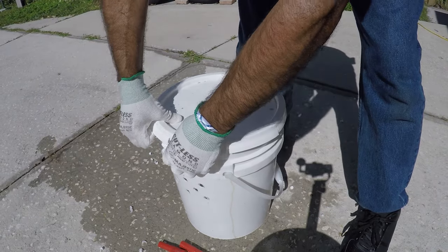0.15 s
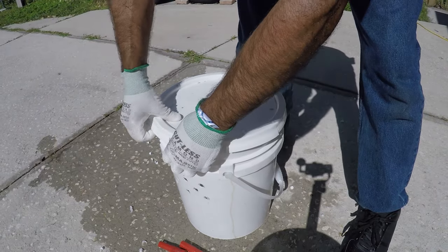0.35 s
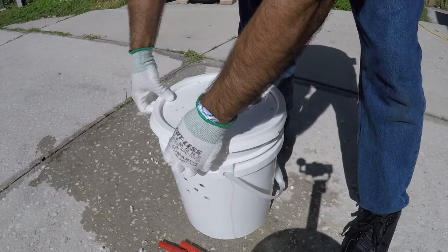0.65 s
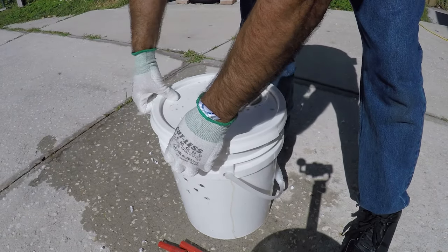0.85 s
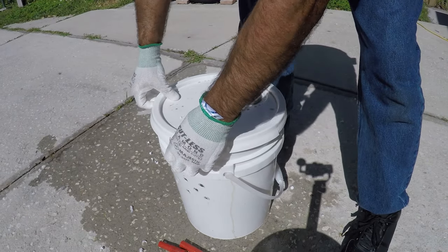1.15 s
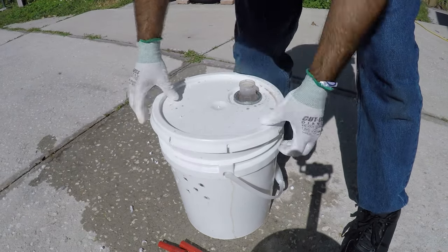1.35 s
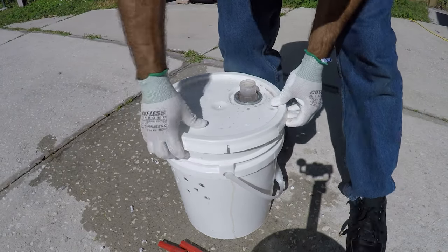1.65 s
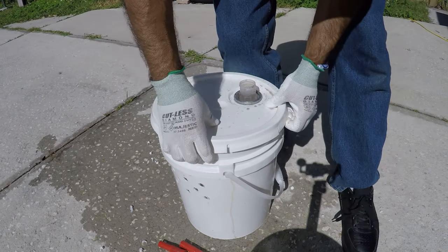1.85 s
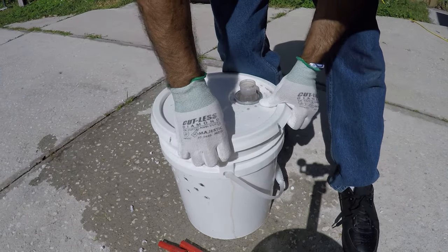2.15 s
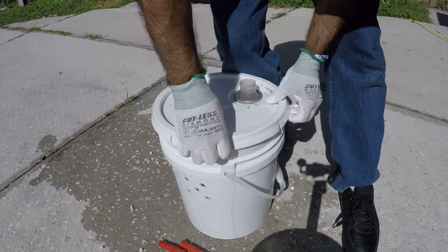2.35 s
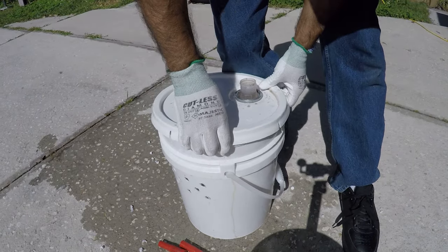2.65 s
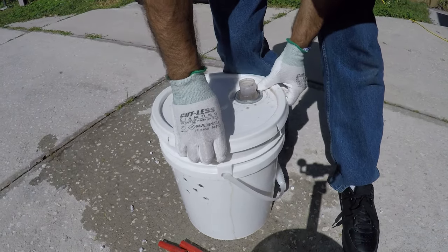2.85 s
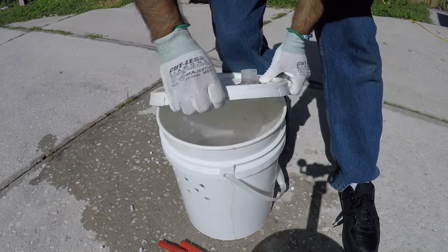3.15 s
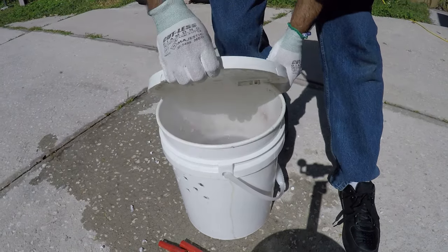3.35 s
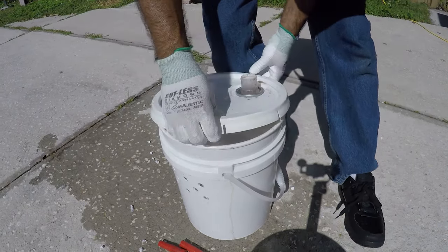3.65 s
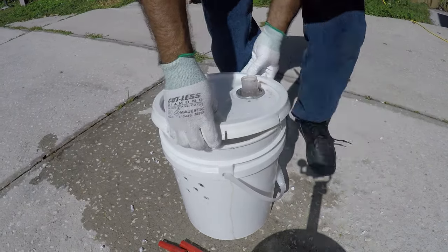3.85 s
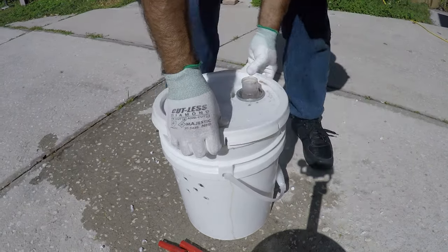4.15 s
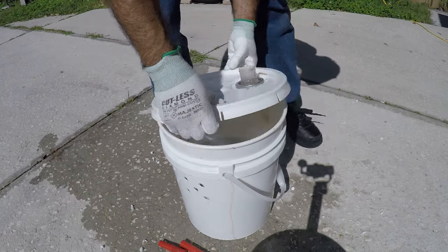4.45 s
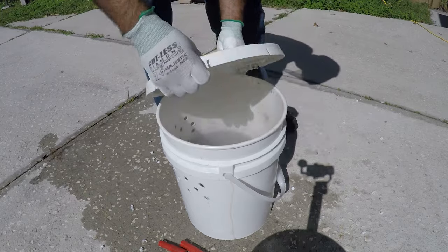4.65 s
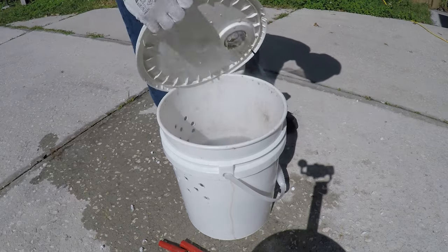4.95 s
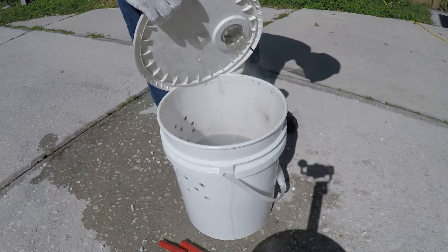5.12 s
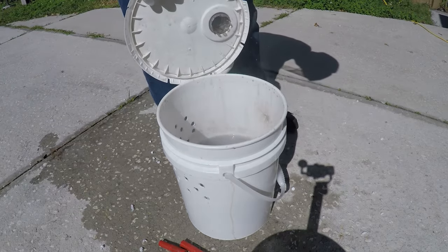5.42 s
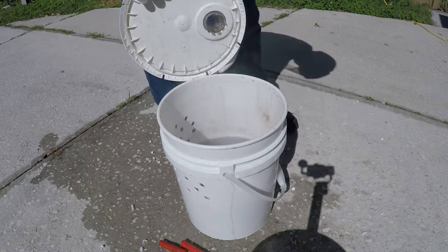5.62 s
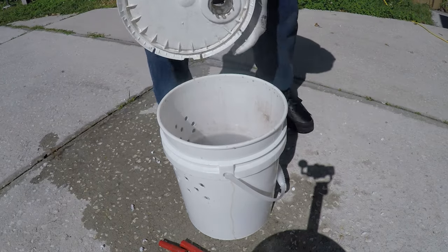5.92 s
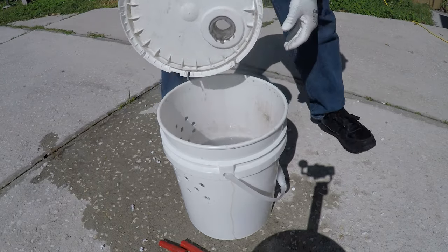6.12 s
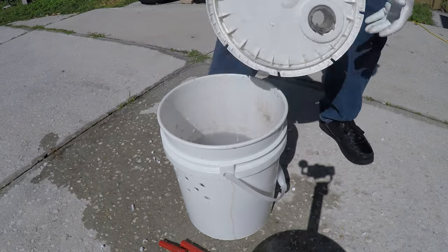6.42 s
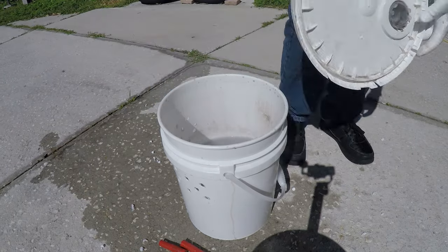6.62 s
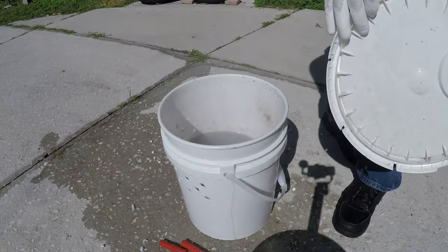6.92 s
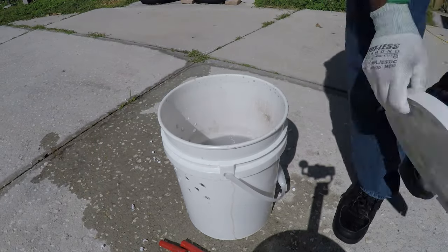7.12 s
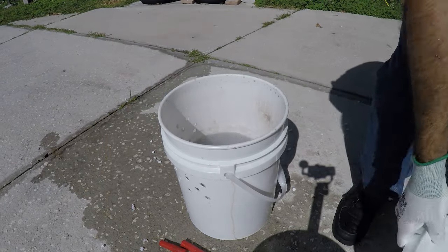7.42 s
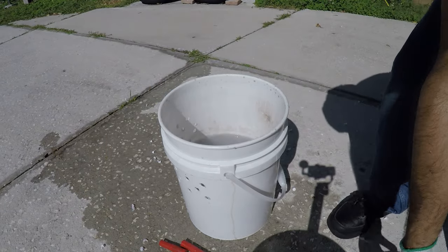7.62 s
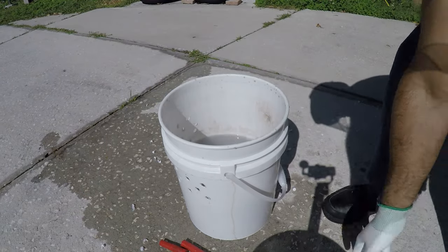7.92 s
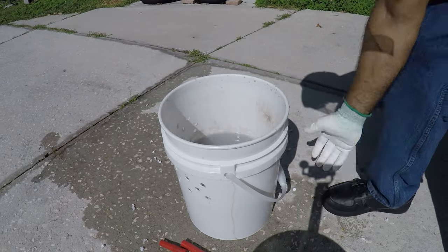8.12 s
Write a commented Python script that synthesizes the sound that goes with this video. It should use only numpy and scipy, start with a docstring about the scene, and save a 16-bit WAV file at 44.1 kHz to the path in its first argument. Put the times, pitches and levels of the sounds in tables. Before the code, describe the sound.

Plastic lid tabs pop loose one by one over a drumming empty bucket, a big knock follows, then the lid clatters down on concrete.

```python
"""Outdoors on concrete, gloved hands prise the lid off an empty plastic bucket, tab by tab, and drop it on the ground.
Each tab snaps as decaying noise and sets lid and air ringing as sines; short noise bursts tick and ring around it.
Gloves and shoes rub as jerky noise, strained plastic creaks in wavering tones, the loose lid rattles its modes.
Far traffic rumbles in noise bands with an engine drone; gain control ducks everything after loud blows.
Table levels are set before panning and gain control."""
import sys
import numpy as np
from scipy import signal
from scipy.io import wavfile
from scipy.ndimage import uniform_filter1d

SR = 44100
rng = np.random.default_rng(int(sys.argv[2]) if len(sys.argv) > 2 else 0)


def bounce(signal):
    """Save signal as a 16-bit WAV file at the path given by the first command-line argument."""
    frames = np.transpose(np.atleast_2d(signal))
    limited = np.clip(frames, -1, 1)
    pcm = np.round(limited * 32767).astype(np.int16)
    wavfile.write(sys.argv[1], SR, pcm)


N = 365148   # samples
SECONDS = np.arange(N) / SR
BLOW_SECONDS = np.arange(SR // 3) / SR   # time within one blow


def from_db(db):
    """Decibels to an amplitude factor."""
    return 10 ** (np.asarray(db) / 20)


def rms_one(x):
    """Scale a signal to rms 1."""
    return x / np.sqrt(np.mean(x ** 2) + 1e-20)


def in_time(rows):
    """Draw each column as a curve over the whole scene."""
    times, *columns = np.transpose(rows)
    return [np.interp(SECONDS, times, column) for column in columns]


def sounding(rows):
    """1 while a curve lasts, 0 outside, with soft ends."""
    to_nearest_end = np.minimum(SECONDS - rows[0][0], rows[-1][0] - SECONDS)
    return np.clip(to_nearest_end / 0.061 + .5, 0, 1)


def at_hz(points, hz):
    """Read a frequency curve, interpolated over log frequency."""
    curve_hz, values = np.array(points).T
    return np.interp(np.log(hz), np.log(curve_hz), values)


def band(x, low_hz, high_hz):
    """Keep the part of a sound between two frequencies."""
    return signal.sosfilt(signal.butter(2, [low_hz, high_hz], "band", fs=SR, output="sos"), x)


def drift(rate_hz):
    """Slow random curve of rms 1: noise smoothed by two equal poles, computed every 40 samples."""
    pole = np.exp(-80 * np.pi * rate_hz / SR)
    noise = rng.standard_normal(N // 40 + 2002)
    slow = signal.lfilter([1], [1, -2 * pole, pole * pole], noise)[2000:]   # drop the filter's start
    return np.interp(np.arange(N) / 40, np.arange(len(slow)), rms_one(slow))


def ring(clicks, hz, t60_s):
    """A two-pole resonator: a unit click starts a dying sine of about height 1."""
    pole = from_db(-60 / (t60_s * SR))
    turn = 2 * np.pi * hz / SR
    return signal.lfilter([0, np.sin(turn)], [1, -2 * pole * np.cos(turn), pole * pole], clicks + 1e-18)


def add(out, x, s):
    """Mix a short sound in at a time in seconds."""
    at = round(s * SR)
    out[at:at + len(x)] += x[:N - at]


def dying(db, t60_s, rise_s):
    """Envelope of one blow: a quick rise and an exponential fall, a third of a second long."""
    fall = from_db(db - 60 * BLOW_SECONDS / max(t60_s, .005))
    return fall * (1 - np.exp(-BLOW_SECONDS / rise_s))


def blow_tone(hz):
    """Steady sine to be shaped by a blow's envelope."""
    return np.sin(2 * np.pi * hz * BLOW_SECONDS)


def grit(spread_db, per_s):
    """Dense clicks of uneven size, rms 1."""
    sizes = from_db(spread_db * np.minimum(rng.exponential(1, N), 4)) * rng.standard_normal(N)
    return rms_one(sizes * (rng.random(N) < per_s / SR))


# Resonances of bucket rim and wall: f/Hz, width/Hz, relative level/dB
RIM_RESONANCES = [(860, 100, -12), (1196, 110, 5.5), (1655, 99, -3), (2010, 49, 0.5), (2347, 177, 1),
                  (2800, 63, 4.5), (474, 95, 3.5)]


def plastic(x, lift_db):
    """The rim and wall resonances lift parts of whatever excites them."""
    rings = 0
    for k, (hz, width_hz, db) in enumerate(RIM_RESONANCES):
        sign = (-1) ** k
        rings = rings + sign * from_db(db) * band(x, hz - width_hz / 2, hz + width_hz / 2)
    return x + from_db(lift_db) * rings


def wavering(rows, width_hz, steady):
    """A tone on its curve: a steady part plus random amplitudes that spread it over a narrow band."""
    hz, db = in_time(rows)
    phase = 2 * np.pi * np.cumsum(hz) / SR
    tone = (steady + drift(width_hz)) * np.sin(phase) + drift(width_hz) * np.cos(phase)
    return from_db(db) * sounding(rows) * tone


# Tonal balance of the far traffic: f/Hz, relative level/dB (density)
STREET_SPECTRUM = [(8.8, -34), (15, -4.5), (37, 1), (92, -4), (126, -7), (150, -15.5), (184, -12.5),
                   (350, -25), (469, -23.5), (575, -28.5), (816, -26.5), (2200, -39.5), (4980, -46.5),
                   (14700, -55), (16000, -73)]
# How alike left and right are in the traffic: f/Hz, correlation (1 = identical)
STREET_LIKENESS = [(60, 0.99), (180, 0.98), (550, 0.77), (1650, 1), (4970, 0.63), (15000, 0.059)]


def street():
    """Far traffic: half-octave bands of stereo noise, each swelling a little on its own."""
    out = 0
    edges_hz = 16 * 2 ** np.arange(0, 10.3, .5)
    white = rng.standard_normal((2, 2, N + SR // 2))   # neighbouring bands take turns with two sources
    for k, (low_hz, high_hz) in enumerate(zip(edges_hz, edges_hz[1:])):
        mid, side = band(white[k % 2], low_hz, high_hz)[:, -N:]
        hz = np.sqrt(low_hz * high_hz)
        alike = np.clip(at_hz(STREET_LIKENESS, hz), -1, 1)
        gain = from_db(at_hz(STREET_SPECTRUM, hz) + 0.32 * drift(3.0))
        out = out + gain * (np.sqrt(1 + alike) * mid + np.sqrt(1 - alike) * side * [[1], [-1]])
    return from_db(-31) * rms_one(out)


# Far engine: t/s, f/Hz, level/dB
ENGINE_DRONE = [(0.0, 92.5, -37.5), (.7, 93, -35), (1.3, 95.7, -40)]


def engine():
    """A far engine holds a low, mostly steady tone."""
    return wavering(ENGINE_DRONE, 4.0, steady=2.13)


# Strokes of gloves and shoes, and a scrape of the landing lid: start t/s, length/s, drive level/dB
RUB_STROKES = [(0.385, 0.11, -47.5), (0.486, 0.2, -57.5), (0.777, 0.031, -41.5), (1.261, 0.052, -44.5),
               (1.614, 0.14, -49), (1.703, 0.1, -39.5), (1.788, 0.064, -40.5), (1.907, 0.099, -47.5),
               (2.424, 0.041, -43), (2.549, 0.04, -46.5), (2.741, 0.17, -45.5), (2.876, 0.056, -43),
               (2.962, 0.067, -41.5), (3.093, 0.023, -32.5), (3.464, 0.078, -48), (3.658, 0.02, -36.5),
               (3.746, 0.06, -43), (4.009, 0.099, -37), (4.387, 0.13, -47.5), (4.53, 0.13, -35.5),
               (5.87, 0.06, -52), (6.367, 0.07, -43), (6.52, 0.2, -53), (6.817, .04, -50),
               (6.942, 0.18, -48.5), (7.484, 0.12, -54), (7.553, 0.11, -41), (7.709, 0.059, -39.5),
               (7.839, 0.077, -26)]
ATTACK_S, RELEASE_S = 0.035, 0.092   # soft ends of a stroke
FIDGET_DB = -83   # drive level of faint handling between strokes
SLIPS_PER_S, SLIP_T60_S = 110, 0.044
SLIDE_SHARE = 0.96   # steady slide against jerks of rms 1


def rubbing():
    """Stick and slip: clumped grains in jerks, part through the plastic, part hollow, part straight hiss."""
    level = from_db(FIDGET_DB)
    for s, length_s, db in RUB_STROKES:
        fade_in = (SECONDS - s) / ATTACK_S
        fade_out = (s + length_s - SECONDS) / RELEASE_S
        level = level + from_db(db) * np.clip(np.minimum(fade_in, fade_out) + .5, 0, 1) ** 2

    slips = rng.random(N) * (rng.random(N) < SLIPS_PER_S / SR)
    slip_decay = from_db(-60 / (SLIP_T60_S * SR))
    jerks = SLIDE_SHARE + rms_one(signal.lfilter([1], [1, -slip_decay], slips))

    grains = grit(2.8, 5000) * from_db(2.2 * drift(70))
    mids = plastic(rms_one(band(grains, 150, 4150)), lift_db=-14.0)
    hollow = from_db(-1.0) * rms_one(band(grains, 240, 1040))
    hiss = from_db(-16.5) * rms_one(band(grains, 3000, 13000))
    return level * rms_one(jerks) * (mids + hollow + hiss)


# Glove squeaks: t/s, f/Hz, level/dB
GLOVE_SQUEAK = [(0.62, 6800, -65), (0.704, 7470, -47.5), (0.73, 7500, -69)]


def squeak():
    """Gloves squeak on plastic: no steady part, so the pitch is blurred and airy."""
    return wavering(GLOVE_SQUEAK, 400, steady=0)


# A tab strains in fits: t/s, f/Hz, level/dB
TAB_CREAK = [(0.36, 545, -60), (0.385, 545, -35), (0.405, 547, -56), (0.46, 597, -47), (0.53, 569, -42.5),
             (0.555, 591, -49), (0.62, 550, -45.5), (0.69, 570, -50), (0.72, 560, -65)]
# Its upper tone: t/s, f/Hz, level/dB
UPPER_CREAK = [(0.4, 940, -58), (0.45, 941, -42.5), (0.5, 930, -58)]
# A high, airy whistle over the tab's creak: t/s, f/Hz, level/dB
CREAK_WHISTLE = [(0.385, 5280, -67), (0.42, 5450, -57), (0.5, 5300, -67)]


def creak():
    """A straining tab creaks on two narrow, wavering tones under a blurred whistle with no steady part."""
    tones = wavering(TAB_CREAK, 38, steady=1.4) + wavering(UPPER_CREAK, 27, steady=1.7)
    return tones + wavering(CREAK_WHISTLE, 194, steady=0)


# Short ticks, extra rings of the bucket and landing lid, and two faint, high chirps, perhaps a bird:
# t/s, level/dB, f/Hz
SHORT_TICKS = [(0.455, -43, 4200), (0.9045, -3, 317), (1.7, -33, 1170), (1.7145, -38, 5450),
               (1.725, -31, 2470), (1.806, -29, 2370), (1.819, -33, 5560), (2.992, -11, 2720),
               (3.001, -23, 2600), (3.666, -50, 2980), (3.9345, -20.5, 2510), (3.936, -17, 3125),
               (3.947, -19.5, 2500), (4.058, -34, 6600), (4.079, -26, 593), (4.421, -41, 4100),
               (4.544, -32, 2400), (4.562, -39, 3350), (4.587, -39, 2900), (4.604, -27, 2300),
               (4.61, -24, 1900), (4.619, -28, 2080), (5.299, 6, 1186), (5.408, -34, 3340),
               (5.713, -37, 1320), (6.374, -43, 4260), (6.393, -40, 4870), (6.686, -41, 4800),
               (6.72, -41, 3130), (6.849, -42, 3380), (7.22, -49, 9500), (7.285, -49, 8100),
               (7.575, -30.5, 816), (7.62, -40, 5800), (7.745, -26, 690), (7.806, -6.5, 2820),
               (7.845, -14, 2000), (7.878, -28, 4020), (7.991, -8.5, 1820)]
DULL_BELOW_DB, RINGS_OVER_DB = -32, 18   # faint ticks are dry; the ring grows over this span


def ticks():
    """A short dying burst of noise around the tick's pitch; harder ticks turn partly into a sine ring."""
    out = np.zeros(N)
    for s, level_db, hz in SHORT_TICKS:
        ring_share = np.clip((level_db - DULL_BELOW_DB) / RINGS_OVER_DB, 0, 0.75)
        noise = rms_one(band(rng.standard_normal(SR // 3), hz / 1.32, hz * 1.26))
        body = (1 - ring_share) * noise + ring_share * blow_tone(hz)
        add(out, dying(level_db, 0.028 + 0.035 * ring_share, 0.00013) * body, s)
    return out


# The big knock shakes the stand: t/s, level/dB, t60/s
STAND_THUMP = (5.284, 1, 0.26)


def thump():
    """The shaken stand gives a deep 43 Hz swing with lumpy low noise on top."""
    s, db, t60_s = STAND_THUMP
    out = np.zeros(N)
    lumps = rms_one(band(rng.standard_normal(SR // 3), 120, 290))
    add(out, dying(db, t60_s, 0.0071) * (blow_tone(43) + 0.9 * lumps), s)
    return out


# Contacts as the loose lid lands and wobbles flat:
# t/s, air note level/dB, air note f/Hz, clatter drive level/dB, thud drive level/dB
LID_CONTACTS = [(7.799, -10, 736, 2.5, -3), (7.836, -13, 780, -8.5, -15), (7.862, -20, 1100, -13.5, -29),
                (7.881, -8, 825, -15, -20), (7.937, -7, 860, -20.5, -19), (7.944, -5.5, 784, -22, -25),
                (7.9695, -3, 780, -9.5, -31), (7.979, -7, 760, -15, -30), (7.987, -3, 654, 5, 2.5),
                (8.044, 8.5, 814, -6, -14.5), (8.092, 2, 800, -5, -28), (8.101, 4.5, 826, -18, -26),
                (8.147, -7, 813, -20, -45), (8.16, -10, 798, -29, -46), (8.204, -18, 795, -35, -38),
                (8.241, -23.5, 840, -48, -43)]
# Modes of the loose lid: f/Hz, relative level/dB, t60/s
LID_MODES = [(402, -11, 0.21), (504, -6.5, 0.038), (652, 5, 0.058), (718, 2.5, 0.066), (810, 3.5, 0.054),
             (896, 7, 0.027), (1044, -7, 0.086), (1144, -6, 0.034), (1258, -3, 0.037), (1616, -16, 0.068),
             (2020, -13.5, 0.033), (2865, -21, 0.06)]
WOBBLE_T60_S = 0.062   # air trapped between lid and ground
CONTACT_T60_S, THUD_HZ = 0.076, 294
SCUFF_DB, SCUFF_FADE_DB_PER_S = -11.5, 46   # re clatter on landing; fades as the lid stops sliding


def drops():
    """Each contact with the concrete squeezes the trapped air to a short note, rattles the lid, scuffs and thuds."""
    wobble, clatter, scuff, thud = np.zeros((4, N))
    for s, air_db, air_hz, clatter_db, thud_db in LID_CONTACTS:
        scuff_db = clatter_db + SCUFF_DB - SCUFF_FADE_DB_PER_S * (s - LID_CONTACTS[0][0])
        add(wobble, dying(air_db, WOBBLE_T60_S, 0.0019) * blow_tone(air_hz), s)
        add(clatter, dying(clatter_db, CONTACT_T60_S, 0.0006), s)
        add(scuff, dying(scuff_db, 1.37 * CONTACT_T60_S, 0.0013), s)
        add(thud, dying(thud_db, CONTACT_T60_S, 0.0013), s)

    rattle = 0
    for hz, db, t60_s in LID_MODES:
        rattle = rattle + from_db(db - 28.0) * ring(clatter * rng.standard_normal(N), hz, t60_s)
    thuds = from_db(-19.0) * ring(thud * rng.standard_normal(N), THUD_HZ, 0.053)
    thuds += from_db(-22.5) * ring(thud * rng.standard_normal(N), THUD_HZ / 2.16, 0.077)

    scrape = band(grit(2.2, 5000), 1200, 3670)
    singing = 0.92 * band(scrape, 2890, 3130)   # the rim sings near its upper mode as it slides
    return wobble * from_db(1.3 * drift(80)) + rattle + thuds + scuff * rms_one(scrape + singing)


# Tabs and knocks on the bucket: t/s, crack level/dB, body level re crack/dB, edge level re crack/dB,
# nominal crackle t60/s, lid drum level/dB, lid drum f/Hz, air boom level/dB
TAB_SNAPS = [(0.172, -31, 18.5, -31, 0.12, -9, 229.6, -5.5), (0.9015, -9.5, 3.5, -8, 0.096, -3, 228, -10),
             (1.1811, -38, 13, -12, 0.025, -23.5, 212, -32), (1.7563, -21, 2, -7, 0.057, -27.5, 267, -30),
             (1.7634, -20, -6, -6, 0.19, -28, 263, -30), (2.1352, -10.5, 4.5, -6.5, 0.081, -1, 227, -7),
             (2.208, -10, 1.5, -6.5, 0.1, 4.5, 223, -13.5), (2.324, -50.5, 14, -14, 0.17, -20, 256, -23.5),
             (2.861, -50, 18, -4, 0.16, -22.5, 303, -23), (2.89, -44, 20, -14, 0.2, -17, 210, -18.5),
             (2.992, -16, 5, -10, 0.066, -11.5, 207, -19.5), (3.0655, -52, 16, -6, 0.2, -16.5, 235, -23),
             (3.137, -29.5, 13, -22, 0.057, -13.5, 307, -38), (3.464, -53, 17, -1, 0.49, -26.5, 322, -29.5),
             (3.7777, -43.5, 7, 4, 0.14, -29.5, 247, -53),
             (3.9303, -9.5, -3.5, -7, 0.16, -14.5, 369.4, -28), (4.134, -54, 17, -17, 0.095, -25, 259, -43),
             (4.2002, -30, 8.5, -22, 0.28, -6.5, 241, -21), (4.2274, -21, 11, -7, 0.07, -8, 285, -19.5),
             (4.543, -25.5, -0.5, -6.5, 0.17, -16.5, 299, -20.5), (4.577, -38, 10, 0, 0.2, -25, 348, -21.5),
             (4.6965, -22.5, -5, -27, 0.055, -30, 317, -31), (4.7022, -28, 7, -25, 0.1, -25, 316, -38),
             (5.2838, 8.5, 6.5, -14, 0.047, 1, 377, -18), (5.2987, 1, 6.5, -22, .14, -1.5, 288, -8),
             (5.511, -39, 4.5, -18, 0.067, -37.5, 168, -28), (6.422, -41.5, 8, 5.5, .044, -30, 185, -43),
             (7.477, -54.5, 15, -3, 0.16, -22, 187, -31)]
CRACK_T60_S, CRACKLE_DB = .018, -10.5   # crackle level re crack
DRUM_T60_S, UPPER_DRUM_DB = 0.089, -2.5   # second drum mode re first
BOOM_HZ, BOOM_T60_S = 131.7, 0.22   # air inside the bucket


def snaps():
    """A tab lets go in a sharp crack and dying crackle; a moment later the lid drums and the air inside booms."""
    body, crack, edge, low = np.zeros((4, N))
    for s, crack_db, body_db, edge_db, t60_s, drum_db, drum_hz, boom_db in TAB_SNAPS:
        layers = [(body, crack_db + body_db, 0.95), (crack, crack_db, 1), (edge, crack_db + edge_db, 1.05)]
        for out, db, longer in layers:
            sharp = dying(db, CRACK_T60_S, 0.00077)
            crackle = dying(db + CRACKLE_DB, t60_s * longer, 0.0006)
            add(out, sharp + crackle, s)
        drum = dying(drum_db, DRUM_T60_S, 0.00069) * blow_tone(drum_hz)
        upper_drum = dying(drum_db + UPPER_DRUM_DB, 0.055, 0.0044) * blow_tone(1.42 * drum_hz)
        boom = dying(boom_db, BOOM_T60_S, 0.0036) * blow_tone(BOOM_HZ)
        add(low, drum, s + 0.00334)
        add(low, upper_drum, s + 0.0031)
        add(low, boom, s + 0.0045)

    chips = grit(2.0, 9000) * from_db(2.5 * drift(90))
    body_noise = rms_one(band(chips, 305, 1704))
    crack_noise = rms_one(band(chips, 1270, 3810))
    edge_noise = rms_one(band(chips, 3110, 6500) + 0.13 * band(chips, 3400, 16000))
    noisy = body * body_noise + crack * crack_noise + edge * edge_noise
    return plastic(noisy, lift_db=0.0) + low


def scene():
    """Pan near and far sounds slightly, and spread the near treble between left and right."""
    far = (engine() + street()) * from_db([[-.6], [.6]])
    hands = rubbing() + squeak() + creak() + ticks() + thump() + snaps()
    near = hands * from_db([[-.5], [.5]]) + drops() * from_db([[-.1], [.1]])
    # the two microphone ports hear the treble by different paths
    center = near.mean(0)
    side = from_db(-10.0) * band(np.roll(center, 23), 3270, 22000)
    side += from_db(-24) * np.roll(center, 40)   # a fainter, later full-range path
    return near + side * [[1], [-1]] + far


LOUD_DB, RELEASE_DB_PER_S = -8, 19.5   # gain control threshold and recovery
CUTOFF_HZ = 16300   # 60 dB down from here up


def record(dry):
    """Gain control looks ahead, pulls loud blows down and recovers slowly; peaks are rounded, the top is cut."""
    climb = RELEASE_DB_PER_S * SECONDS
    level_db = 10 * np.log10(uniform_filter1d(np.mean(dry ** 2, 0), size=300) + 1e-12)
    over_db = np.maximum(level_db - LOUD_DB, 0)
    held_db = np.maximum.accumulate(over_db + climb) - climb   # peak hold that falls at the recovery rate
    padded = np.append(held_db, np.full(250, held_db[-1]))
    ahead_db = uniform_filter1d(padded, size=500)[250:]   # smoothed and moved 250 samples early
    ducked = dry * from_db(-ahead_db)
    limited = ducked / (1 + (ducked / .66) ** 4) ** .25
    return signal.sosfilt(signal.cheby2(12, 60, CUTOFF_HZ, fs=SR, output="sos"), limited)


dry = scene()
out = record(dry)
bounce(out)
```